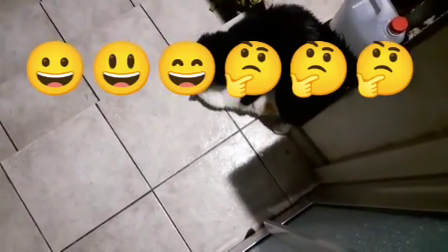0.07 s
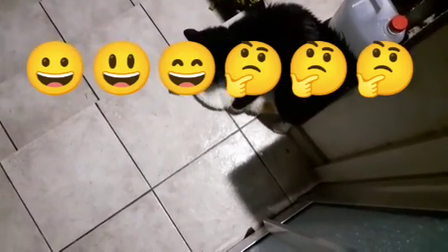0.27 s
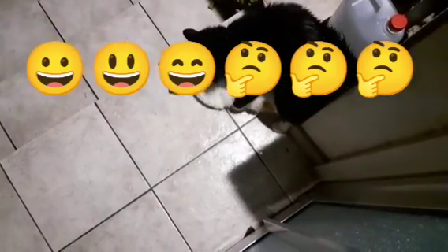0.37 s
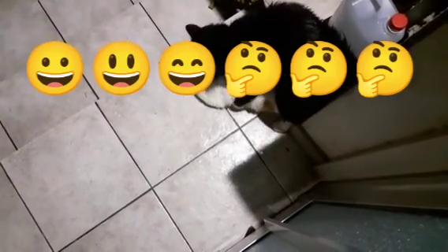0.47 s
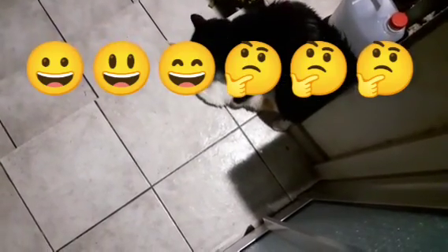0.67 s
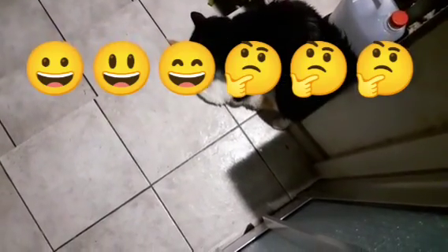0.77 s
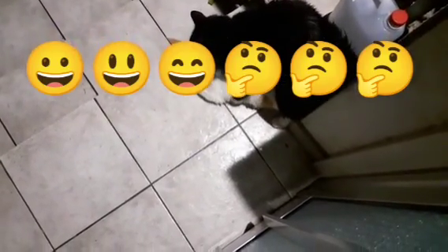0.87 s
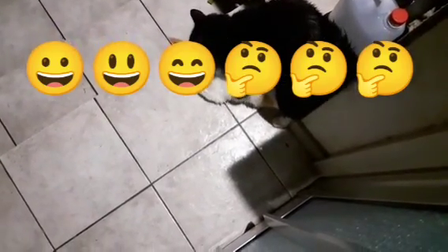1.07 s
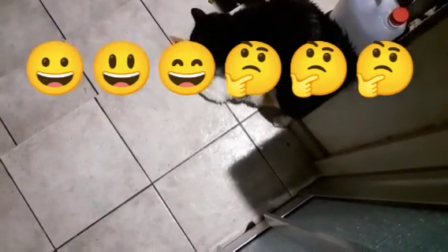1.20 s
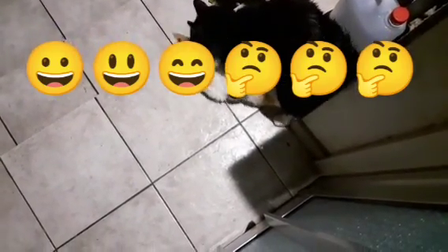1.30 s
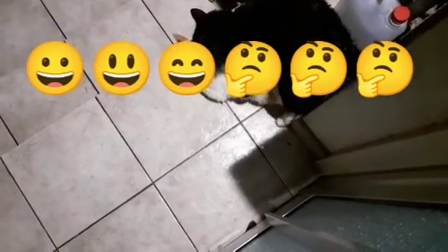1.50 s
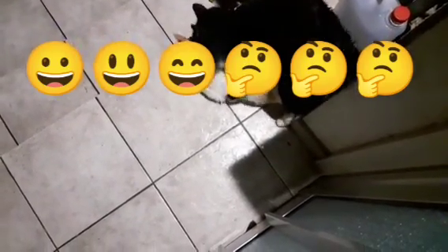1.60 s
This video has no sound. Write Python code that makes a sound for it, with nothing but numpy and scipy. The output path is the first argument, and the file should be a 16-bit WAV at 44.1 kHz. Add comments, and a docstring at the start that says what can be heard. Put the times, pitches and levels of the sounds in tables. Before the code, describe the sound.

A cat gives one short, low growling yowl over a steady room hum.

```python
"""A cat gives one low growling yowl in a small tiled room, close to the microphone.
Its vocal folds start on a wavering, almost pure moan, break into a rough low growl,
then jump to a louder, clean falling moan. Air hisses faintly through its mouth and a short
grunt follows. The room adds a short tail and rumbles, hums and hisses throughout."""
import sys
import numpy as np
from scipy import signal
from scipy.fft import rfft, irfft, next_fast_len
from scipy.io import wavfile
from scipy.ndimage import map_coordinates

SR = 44100
rng = np.random.default_rng(int(sys.argv[2]) if len(sys.argv) > 2 else 0)


def wrap_up_sound(samples):
    """Save the sound to the file named by the first command line argument, as 16-bit audio."""
    columns = np.atleast_2d(samples).T
    # keep every value between -1 and 1, then stretch to whole-number steps
    tamed = np.clip(columns, -1, 1)
    steps = np.round(tamed * 32767).astype(np.int16)
    wavfile.write(sys.argv[1], SR, steps)


N = 72765

# The two moans. Each row: time in seconds, pitch in Hz, level in dB, rasp-to-tone ratio.
OPENING_MOAN = [(.132, 500, -60, .5), (.139, 560, -50, .4), (.147, 612, -48, .4), (.166, 490, -57, 1),
                (.186, 560, -51, 1), (.2, 625, -56, .8), (.209, 575, -46.5, .3), (.217, 555, -46, .3),
                (.227, 465, -46, .3), (.241, 605, -42, .2), (.25, 450, -45, .2), (.26, 508, -41, .08),
                (.286, 503, -39, .06), (.298, 455, -44, .3), (.307, 456, -39.5, .2), (.32, 435, -50, .3)]
CLOSING_MOAN = [(.623, 590, -50, .3), (.628, 595, -37, .2), (.637, 622, -35, .1), (.648, 550, -37.5, .06),
                (.666, 560, -33.7, .03), (.706, 499, -30.5, .03), (.724, 443, -32, .05),
                (.75, 468, -30.3, .05), (.765, 453, -31.3, .1), (.773, 390, -37.5, .45),
                (.78, 441, -31.5, .07), (.797, 432, -32.7, .03), (.804, 415, -50, .1)]
# High-register spectrum. Each row: harmonic number, relative level in dB.
MOAN_HARMONICS = [(1, 0), (2, -24.5), (3, -39)]

def moan(rows):
    """Vocal folds in the high register: almost a pure tone."""
    hz, db, rough = curves(rows)
    return gate(rows) * amp(db) * folds(hz, MOAN_HARMONICS, rough, jitter=.0095, shimmer_db=1.38)


# Growl contour. Each row: time in seconds, pulse rate in Hz, level in dB.
GROWL = [(.288, 228, -54), (.304, 215, -48), (.33, 206, -46), (.354, 222, -44), (.39, 211, -45.5),
         (.403, 215, -45), (.416, 230, -42), (.427, 218, -45), (.44, 221, -42), (.458, 213, -47),
         (.468, 222, -43), (.475, 220, -48), (.482, 226, -42.5), (.51, 229, -44), (.535, 226, -44.5),
         (.566, 221, -47.5), (.59, 224, -45), (.622, 216, -45), (.633, 212, -55)]
# Low-register spectrum. Each row: harmonic number, relative level in dB.
GROWL_HARMONICS = [(1, -11.5), (2, -3), (3, -0.5), (4, -19), (5, -26.5), (6, -32)]

def growl():
    """Low register: uneven pulses, strongest in the second and third harmonics."""
    hz, db = curves(GROWL)
    return gate(GROWL) * amp(db) * folds(hz, GROWL_HARMONICS, rough=.36, jitter=.022, shimmer_db=1.9)


# Grunt contour. Each row: time in seconds, pitch in Hz, level in dB, rasp-to-tone ratio (capped at 1).
GRUNT = [(1.603, 468, -58.5, 0.9), (1.61, 486, -53, 1), (1.625, 562, -50, 1.1), (1.634, 490, -57, 0.9)]

def grunt():
    """A brief, hoarse catch of the voice."""
    hz, db, rough = curves(GRUNT)
    hoarse = folds(hz, MOAN_HARMONICS, np.clip(rough, 0, 1), jitter=.15, shimmer_db=3.5)
    return gate(GRUNT) * amp(db) * hoarse


# Rasp spectrum. Each row: frequency in Hz, relative level in dB.
RASP_SPECTRUM = [(60, -47.5), (200, -9.5), (320, -6.5), (440, -0.5), (720, 0), (830, -16), (1100, -15),
                 (1500, -33), (3000, -50.5), (8000, -81.5)]

def folds(hz, harmonics, rough, jitter, shimmer_db):
    """Vocal folds: unsteady harmonic cycles plus a rasp that puffs once a cycle."""
    phase = 2 * np.pi * np.cumsum(hz * (1 + jitter * wobble(200))) / SR
    tone = unit(sum(amp(db) * np.cos(k * phase) for k, db in harmonics))
    rasp = unit(noise(RASP_SPECTRUM) * (1 + .13 * np.cos(phase)))
    shimmer = amp(shimmer_db * wobble(170))
    return (tone * shimmer + rough * rasp) / np.sqrt(1 + rough ** 2)


# Voice balance. Each row: frequency in Hz, left minus right in dB.
VOICE_PAN = [(200, 7), (400, -2), (520, 1.5), (700, 4), (1300, -0.5), (2400, 5.5)]
# Voice phase. Each row: frequency in Hz, left lead in radians.
VOICE_PHASE = [(200, 0.22), (450, 0.05), (650, .35), (800, .6), (950, 1.8), (1200, 0), (1600, 0.061)]

def mic_ports(hz):
    """The voice reaches two microphone ports at different levels and phases."""
    lead_rad = along(VOICE_PHASE, hz)
    return pan(along(VOICE_PAN, hz)) * np.exp(1j * np.array([[.5], [-.5]]) * lead_rad)


# Mouth resonances. Each row: time in seconds, centre in Hz, level in dB.
HIGH_HISS = [(.26, 8020, -105), (.33, 7800, -88.5), (.4, 7360, -88), (.55, 6730, -86), (.7, 6520, -91.5),
             (.82, 6050, -103)]
LOW_HISS = [(.12, 4100, -87.5), (.27, 4000, -90), (.33, 3950, -81.5), (.375, 4550, -87.5), (.46, 4590, -89),
            (.53, 5800, -92), (.66, 5630, -86.5), (.735, 4940, -83), (.8, 4960, -84.5)]
GRUNT_HISS = [(1.6, 4930, -94), (1.625, 4800, -78.5), (1.65, 4900, -74)]

def hiss(rows, width_hz, pan_db):
    """Air splutters in a narrow resonance that glides as the mouth changes shape."""
    hz, db = curves(rows)
    phase = 2 * np.pi * np.cumsum(hz) / SR
    band = unit(wobble(width_hz) * np.cos(phase) + wobble(width_hz) * np.sin(phase))
    splutter_db = 2.5 * wobble(30)
    return pan(pan_db) * gate(rows) * amp(db + splutter_db) * band


# Airflow. Each row: time in seconds, relative level in dB.
AIRFLOW = [(.11, -17), (.15, -6.5), (.22, -7), (.3, 5), (.58, 1.5), (.76, 5.5), (.81, 4), (.88, -3.5)]
# Breath spectrum. Each row: frequency in Hz, relative level in dB.
BREATH_SPECTRUM = [(100, -14), (190, 11.5), (330, 12), (500, 0), (1000, 2.5), (2000, 3.5), (2800, -4.5),
                   (3500, -17.5), (6000, -17.5), (8500, -27.5), (11000, -22), (15000, -17)]
# Balance of breath and room hiss. Each row: frequency in Hz, left minus right in dB.
NOISE_PAN = [(60, 4), (200, 4), (400, 2.5), (1300, 3.5), (2400, 4.5), (4400, -4.5), (8000, 1),
             (15000, -1.5)]

def breath():
    """Air through the mouth: a broad rush and narrow hisses."""
    flow_db, = curves(AIRFLOW)
    rush = np.array([noise(BREATH_SPECTRUM), noise(BREATH_SPECTRUM)])
    rush = filtered(rush, lambda hz: pan(along(NOISE_PAN, hz)))
    return (amp(flow_db - 65.5) * rush
            + hiss(HIGH_HISS, width_hz=840, pan_db=12.5)
            + hiss(LOW_HISS, width_hz=650, pan_db=-19)
            + hiss(GRUNT_HISS, width_hz=650, pan_db=-19))


# Room decay. Each row: frequency in Hz, time to fall 60 dB in seconds.
ROOM_T60 = [(200, 0.35), (500, 0.37), (2000, 0.19), (10000, 0.25)]

def reverb(x):
    """Reflections off the tiles: a short tail, longest in the lows."""
    hz, t, spectra = signal.stft(rng.standard_normal((2, SR // 2)), SR, nperseg=256)
    decay = amp(-60 * t / along(ROOM_T60, hz)[:, None])
    mid, side = signal.istft(spectra * decay, SR, nperseg=256)[1]
    tail = mid + np.array([[.4], [-.4]]) * side
    return signal.fftconvolve(x, tail / np.linalg.norm(tail[0]), axes=1)[:, :N]


# Room hiss spectrum. Each row: frequency in Hz, relative level in dB.
ROOM_HISS_SPECTRUM = [(60, -16.5), (130, 1.5), (180, -4.5), (250, -6), (340, -9.5), (410, -17.5),
                      (500, -16.5), (620, -23.5), (950, -17.5), (1300, -26.5), (1900, -26.5), (2800, -38),
                      (3400, -43.5), (4500, -48.5), (5900, -46.5), (6800, -56), (9000, -63), (12000, -49.5),
                      (15500, -45)]
# Room hiss width. Each row: frequency in Hz, left-right correlation.
ROOM_HISS_CORRELATION = [(60, 1), (250, .95), (500, 0.52), (1000, 0.0087), (2000, 0), (12000, 0)]

def room_hiss():
    """Steady dull noise, nearly mono in the lows and wide in the highs."""
    side_gain = lambda hz: np.tan(np.arccos(along(ROOM_HISS_CORRELATION, hz)) / 2)
    mid = noise(ROOM_HISS_SPECTRUM)
    side = filtered(noise(ROOM_HISS_SPECTRUM), side_gain)
    return amp(-55.5) * filtered(np.array([mid + side, mid - side]), lambda hz: pan(along(NOISE_PAN, hz)))


# Hum envelope. Each row: time in seconds, level in dB.
HUM_LEVEL = [(0, -57), (.3, -55.5), (.55, -52), (.75, -47.5), (.95, -54), (1.15, -58.5), (1.65, -52.5)]

def hum(pitch_hz=104.08, waver_hz=2.55, flutter_db=3.3):
    """A low tone wavering in pitch and level."""
    db, = curves(HUM_LEVEL)
    phase = 2 * np.pi * np.cumsum(pitch_hz + waver_hz * wobble(15)) / SR
    return amp(db) * unit(np.sin(phase) * amp(flutter_db * wobble(18)))


# Rumble spectrum. Each row: frequency in Hz, relative level in dB.
RUMBLE_SPECTRUM = [(20, -50.5), (31, -28), (42, -6.5), (58, 2), (76, -8.5), (110, -6.5), (170, -11),
                   (400, -68)]

def rumble(level_db=-53.5, swell_db=3.5):
    """Deep noise that swells at random."""
    return amp(level_db) * unit(noise(RUMBLE_SPECTRUM) * amp(swell_db * wobble(12)))


def amp(db):
    """Decibels to gain."""
    return 10 ** (np.asarray(db) / 20)


def unit(x):
    """Scale to rms 1."""
    return x / np.sqrt(np.mean(x ** 2) + 1e-20)


def along(points, hz):
    """Interpolate (Hz, value) points on a log axis."""
    f, v = np.transpose(points)
    return np.interp(np.log(hz + 1), np.log(f + 1), v)


def curves(rows):
    """One value per sample for each column after the time."""
    times_s, *cols = np.transpose(rows)
    return [np.interp(np.arange(N) / SR, times_s, c) for c in cols]


def gate(rows, fade_s=.0038):
    """Open from the first row's time to the last, with soft edges."""
    t = np.arange(N) / SR
    return np.clip(np.minimum(t - rows[0][0], rows[-1][0] - t) / fade_s + 1, 0, 1)


def wobble(knots_per_s):
    """Smooth random curve."""
    return map_coordinates(rng.standard_normal(N // 8), [np.arange(N) * knots_per_s / SR], mode="wrap")


def filtered(x, response):
    """Apply a frequency response."""
    size = next_fast_len(N + 8192)
    return irfft(rfft(x, size) * response(np.fft.rfftfreq(size, 1 / SR)), size)[..., :N]


def pan(db):
    """Stereo gains for a left-minus-right level."""
    gains = amp(np.array([[.5], [-.5]]) * db)
    return gains / gains.mean(axis=0)


def noise(spectrum):
    """Coloured noise of rms 1."""
    return unit(filtered(rng.standard_normal(N), lambda hz: amp(along(spectrum, hz))))


def scene():
    """The cat in its room, in stereo."""
    voice = moan(OPENING_MOAN) + growl() + moan(CLOSING_MOAN) + grunt()
    voice = amp(-.05) * filtered(voice, mic_ports)
    return voice + amp(-17.5) * reverb(voice) + breath() + room_hiss() + pan(db=5) * (hum() + rumble())


def record(dry):
    """Brick-wall low-pass at 15750 Hz."""
    return filtered(dry, lambda hz: hz < 15750)


dry = scene()
out = record(dry)
wrap_up_sound(out)
```